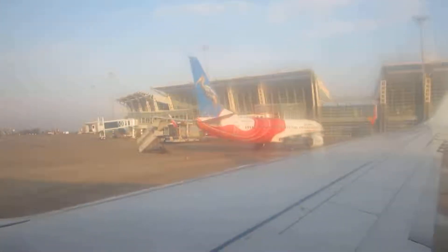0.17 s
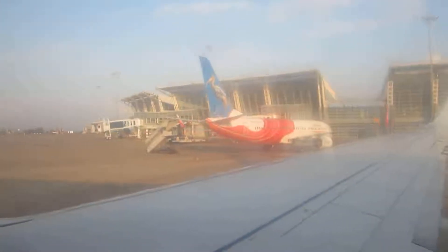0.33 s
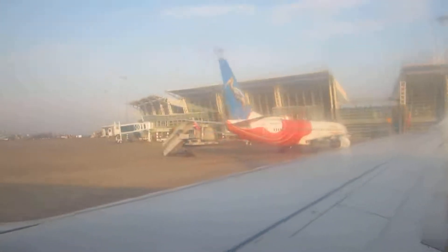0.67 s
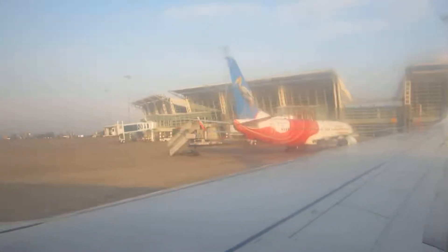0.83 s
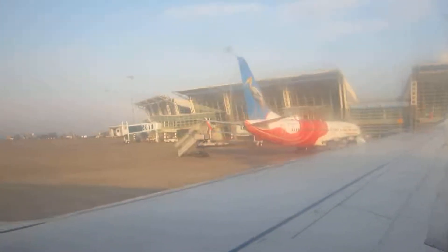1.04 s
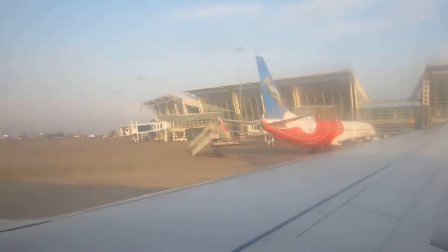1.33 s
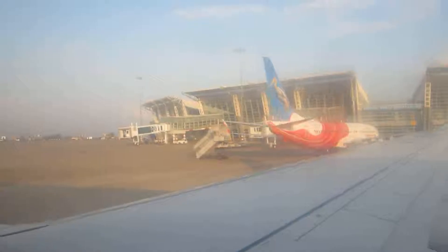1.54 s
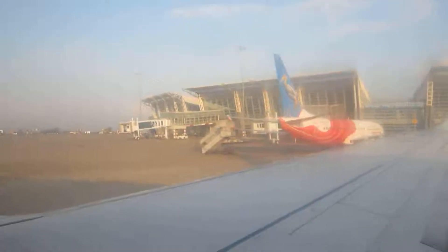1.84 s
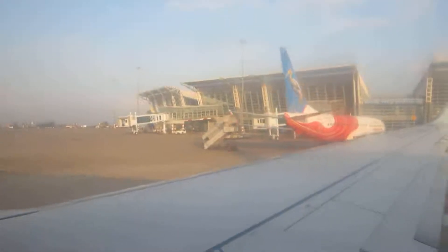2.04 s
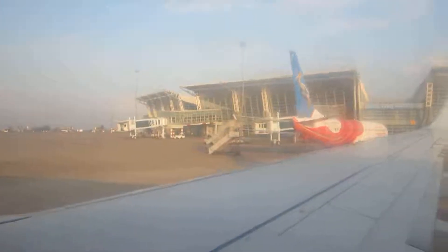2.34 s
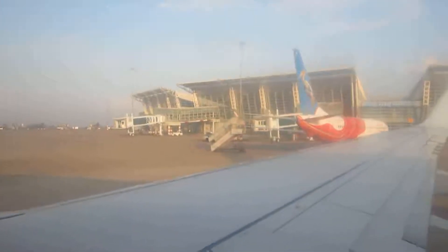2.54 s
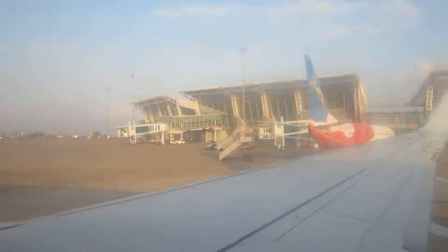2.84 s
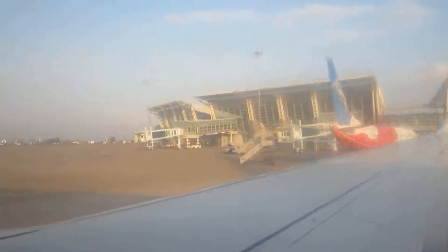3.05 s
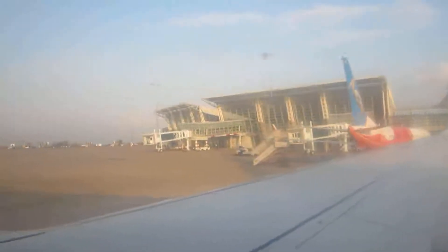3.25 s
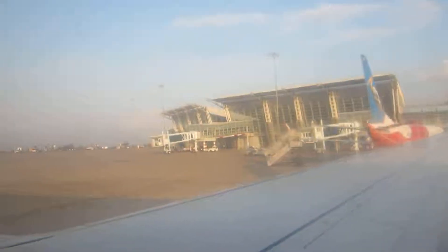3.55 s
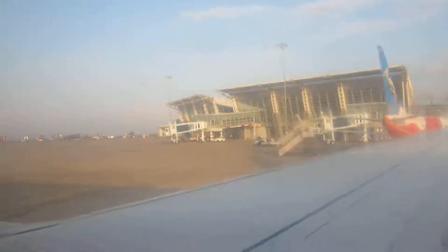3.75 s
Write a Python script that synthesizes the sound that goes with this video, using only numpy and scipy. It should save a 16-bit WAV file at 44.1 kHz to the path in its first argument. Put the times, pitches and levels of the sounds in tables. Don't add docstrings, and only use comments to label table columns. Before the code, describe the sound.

Low booming rumble of a taxiing jet airliner heard inside, with soft hiss and trim ticks

```python
import sys
import numpy as np
from scipy import signal
from scipy.fft import rfft, irfft
from scipy.io import wavfile

SR = 44100
rng = np.random.default_rng(int(sys.argv[2]) if len(sys.argv) > 2 else 0)


def nominal_scale(level):
    x = np.asarray(level, float) / 20
    return 10 ** x


def store_pcm(level_fs):
    pcm = np.round(np.clip(level_fs, -1, 1) * 32767).astype(np.int16)
    wavfile.write(sys.argv[1], SR, np.atleast_2d(pcm).T)


N = 171990

# pitch_hz, density_db
RUMBLE_SPECTRUM = [(7, -39), (34, 0), (40, -6.5), (110, 0.5), (440, -7.5), (478, -11.5), (800, -26),
                   (1100, -32.5)]
# pitch_hz, density_db
ROAR_SPECTRUM = [(410, 3), (700, -4), (760, -6.5), (979, -0.5), (1150, -5), (1510, -6.5), (2420, -8),
                 (3600, -19), (4680, -29), (7920, -120)]
# pitch_hz, width_hz, level_db
CABIN_BOOMS = [(20.3, 34, -39), (46.8, 23, -31.5), (123, 25, -37), (155.1, 25, -37.5), (205, 13, -39.5),
               (269.3, 34, -33), (340.3, 19.5, -36.5), (429.1, 28, -34), (494, 19, -48), (532.3, 41, -49.5)]
# time_s, level_db (about its mean)
LOAD_CURVE = [(0.0, -22), (0.02, -20), (0.14, -25.5), (0.17, -22.5), (0.3, -21.5), (0.35, -20), (0.38, -23),
              (0.95, -22.5), (1.47, -20.5), (1.5, -22), (3.84, -22), (3.9, -20.5)]
# time_s, level_db
THRUST_CURVE = [(0, -1), (.25, 0.5), (.5, -1.5), (.95, .5), (1.5, 0), (1.8, -0.5), (2.4, 1), (2.83, -1.5),
                (3.16, 1), (3.9, 1.5)]
# time_s, rms_db
SHAFT_SWELL = [
    (0, -35),
    (.5, -26.5),
    (1.1, -30),
    (1.5, -25),
    (2.1, -28),
    (2.4, -29.5),
    (2.9, -27),
    (3.35, -27.5),
    (3.9, -36),
]
# multiple, rms_db
PUMP_A_ORDERS = [(1, -48), (3, -48.5), (4, -63), (5, -64)]
PUMP_B_ORDERS = [(1, -51), (2, -54), (3, -59), (4, -69)]
# time_s, rms_db
PUMP_A_BEAT = [(0.0, -53), (0.34, -40), (1.29, -46), (2.1, -42.5), (3.02, -54), (3.25, -39.5), (3.32, -57),
               (3.43, -40), (3.9, -46.5)]
# pitch_hz, width_hz, level_db
COMPRESSOR_WHISTLES = [(612, 60, -50), (865, 90, -54), (1493, 22, -53), (2070, 160, -57), (2420, 200, -57),
                       (3000, 80, -65), (3290, 160, -63), (3800, 250, -64)]
# pitch_hz, width_hz, level_db
VENT_LIP_WHISTLES = [(5828, 60, -67), (6126, 40, -65), (6508, 14, -79), (6767, 12, -78)]
# pitch_hz, density_db
VENT_SPECTRUM = [(2500, -16), (3400, -3), (4200, 0), (5500, -1.5), (6300, -3), (7600, -6.5), (8600, -20),
                 (13000, -30)]
# start_s, pitch_hz
TRIM_TICKS = [
    (.3725, 1290),
    (1.381, 1040),
    (2.096, 1250),
    (.960, 2100),
    (2.36, 820),
]
# peak_db, t60_s, overtone_tilt_db
TRIM_BLOWS = [
    (-21.5, 0.028, -0.5),
    (-26.5, 0.11, -40),
    (-32, 0.025, -7),
    (-37, 0.01, 0),
    (-31, .13, -40),
]
# pitch_ratio, level_db
TRIM_MODES = [(1, 0), (.93, -8), (1.08, -8), (1.52, -2), (2.2, -14), (2.72, -11), (2.85, -12)]
# start_s, pitch_hz, peak_db, t60_s
BUCKLE_MODES = [(.960, 6500, -52, .12), (.960, 5900, -50, .025), (.960, 7700, -50, .03),
                (.962, 10160, -54, .12), (.960, 12450, -55, .14), (.982, 5100, -50, .08),
                (.994, 6500, -50, .1), (.994, 9200, -54, .02), (.999, 10160, -50, .2),
                (.377, 3520, -41, .06), (.379, 3680, -44, .05)]
# start_s, length_s, centre_hz
CLOTH_RUSTLES = [(.115, .025, 9300), (.218, .04, 7000), (.215, .045, 10800), (.345, .02, 9300),
                 (.39, .04, 10000), (.775, .02, 9300), (.958, .012, 6500), (.97, .11, 9800),
                 (1.225, .02, 9300), (1.37, .05, 9500), (1.50, .02, 9000), (1.545, .09, 4800),
                 (1.585, .075, 9500), (2.375, .07, 9300), (2.572, .025, 5500), (2.572, .025, 10500),
                 (3.18, .04, 10000), (3.275, .065, 9800), (3.88, .02, 9500)]
CLOTH_LEVELS = [-61, -55, -59, -60, -57, -61, -54, -60, -61, -61, -62, -51, -58, -62, -56, -60, -60, -60,
                -62]
# start_s, length_s, level_db
CLOTH_SNAPS = [
    (.22, .02, -52),
    (.396, .015, -56),
    (1.585, .02, -52),
    (1.61, .025, -50),
    (.957, .008, -49),
    (3.29, .02, -59),
]
# low_hz, high_hz
SNAP_BAND = (4000, 12500)
# start_s, length_s, low_hz, high_hz
TREBLE_GAPS = [(.306, .012, 4200, 5600), (.31, .03, 6400, 13000), (.345, .018, 3500, 4100),
               (1.135, .02, 6300, 13000), (1.14, .012, 4300, 4800), (1.736, .03, 6600, 13000),
               (1.736, .014, 5200, 6600), (2.53, .028, 6300, 13000), (2.545, .014, 4800, 6300),
               (2.615, .03, 6600, 13000), (2.62, .02, 4700, 5000), (2.782, .03, 4300, 5600),
               (2.782, .03, 6500, 13000), (2.805, .01, 5600, 6500), (2.79, .022, 3200, 3600)]


def rms_one(x):
    return x / np.sqrt(np.mean(x ** 2) + 1e-20)


def in_time(rows):
    time_s, value = np.transpose(rows)
    return np.interp(np.arange(N) / SR, time_s, value)


def drift(rate_hz):
    step = 40
    r = np.exp(-2 * np.pi * rate_hz * step / SR)
    slow = signal.lfilter([1], [1, -2 * r, r * r], rng.standard_normal(N // step + 4002))
    slow = slow[4000:]
    return np.interp(np.arange(N) / step, np.arange(len(slow)), rms_one(slow - slow.mean()))


def coloured(spectrum, patchy_db, rate_hz):
    hz, db = np.transpose(spectrum)
    octave = np.log2(np.maximum(np.arange(N // 2 + 1) * SR / N, 1))
    gain = nominal_scale(np.interp(octave, np.log2(hz), db, left=-90, right=-90))
    shaped = rfft(rng.standard_normal(N)) * gain
    out = np.zeros(N)
    for centre in range(3, 15):
        band = np.clip(1 - abs(octave - centre), 0, 1)
        out += irfft(shaped * band, N) * nominal_scale(patchy_db * drift(rate_hz))
    return rms_one(out)


def resonant_noise(hz, width_hz):
    r = np.exp(-np.pi * width_hz / SR)
    poles = [1, -2 * r * np.cos(2 * np.pi * hz / SR), r * r]
    once = rms_one(signal.lfilter([1, 0, -1], poles, rng.standard_normal(N + SR // 4)))
    return rms_one(signal.lfilter([1, 0, -1], poles, once)[SR // 4:])


def resonances(rows):
    return sum(nominal_scale(db) * resonant_noise(hz, width_hz) for hz, width_hz, db in rows)


def tone(hz, wander_hz, flutter_db):
    turns = np.cumsum(hz + wander_hz * drift(2.1)) / SR + rng.random()
    return np.sqrt(2) * np.sin(2 * np.pi * turns) * nominal_scale(flutter_db * drift(6.2))


def ring(start_s, peak_db, hz, t60_s):
    t = np.maximum(np.arange(N) / SR - start_s, 0)
    rise = 1 - np.exp(-t / 0.00024)
    return nominal_scale(peak_db - 60 * t / t60_s) * np.sin(2 * np.pi * hz * t) * rise


def fuselage():
    load_db = in_time(LOAD_CURVE)
    load_db = load_db - load_db.mean()
    rumble = nominal_scale(-21.5) * coloured(RUMBLE_SPECTRUM, patchy_db=0.84, rate_hz=0.49)
    booms = resonances(CABIN_BOOMS)
    roar = nominal_scale(-38.94) * coloured(ROAR_SPECTRUM, patchy_db=1.16, rate_hz=9.2)
    roar_db = 0.38 * load_db + in_time(THRUST_CURVE)
    return nominal_scale(load_db) * (rumble + booms) + nominal_scale(roar_db) * roar


def shaft():
    return nominal_scale(in_time(SHAFT_SWELL)) * tone(147, wander_hz=1.28, flutter_db=0.5)


def pumps():
    pump_a_hz, pump_b_hz = 335, 881.7
    out = nominal_scale(in_time(PUMP_A_BEAT) + 0.5) * tone(2 * pump_a_hz, wander_hz=0.57, flutter_db=1.3)
    for hz, orders in ((pump_a_hz, PUMP_A_ORDERS), (pump_b_hz, PUMP_B_ORDERS)):
        for k, db in orders:
            out += nominal_scale(db) * tone(k * hz, wander_hz=0.34 * k, flutter_db=3.4)
    return out


def whistles():
    return resonances(COMPRESSOR_WHISTLES) + resonances(VENT_LIP_WHISTLES)


def trim():
    out = np.zeros(N)
    for (start_s, hz), (peak_db, t60_s, tilt_db) in zip(TRIM_TICKS, TRIM_BLOWS):
        for ratio, mode_db in TRIM_MODES:
            level_db = peak_db + mode_db + tilt_db * np.sqrt(abs(np.log2(ratio)))
            out += ring(start_s, level_db, hz * ratio, t60_s / np.sqrt(ratio))
    return out


def buckle():
    return sum(ring(start_s, db, hz, t60_s) for start_s, hz, db, t60_s in BUCKLE_MODES)


def rustles():
    t = np.arange(N) / SR
    grains_per_s, width_octaves = 8400, 0.22
    out = np.zeros(N)
    grains = rng.standard_normal(N) * (0.62 + (rng.random(N) < grains_per_s / SR))
    for (start_s, length_s, hz), db in zip(CLOTH_RUSTLES, CLOTH_LEVELS):
        edges = hz * 2 ** (width_octaves * np.array([-0.5, 0.5]))
        edges = np.clip(edges, 100, 0.45 * SR)
        band = rms_one(signal.sosfilt(signal.butter(2, edges, "band", fs=SR, output="sos"), grains))
        u = (t - start_s) / length_s
        swell = np.clip(u * 12, 0, 1) * np.clip((1 - u) * 2, 0, 1)
        out += nominal_scale(db) * band * swell
    return out


def snaps():
    t = np.arange(N) / SR
    band_filter = signal.butter(2, SNAP_BAND, "band", fs=SR, output="sos")
    hiss = rms_one(signal.sosfilt(band_filter, rng.standard_normal(N)))
    swell = np.zeros(N)
    for start_s, length_s, db in CLOTH_SNAPS:
        swell += nominal_scale(db) * np.sin(np.pi * np.clip((t - start_s) / length_s, 0, 1))
    return hiss * swell


def vents():
    return nominal_scale(-52 + in_time(THRUST_CURVE)) * coloured(VENT_SPECTRUM, patchy_db=0.8, rate_hz=9.0)


def scene():
    engines = fuselage() + shaft() + pumps() + whistles()
    touches = trim() + buckle() + rustles() + snaps()
    return (engines + touches + vents())[None]


def band_limit(x):
    return signal.sosfilt(signal.butter(12, 12720, fs=SR, output="sos"), x)


def record(dry):
    t, hz = np.arange(N) / SR, np.arange(N // 2 + 1) * SR / N
    spectrum = rfft(dry)
    mix = dry
    for start_s, length_s, low_hz, high_hz in TREBLE_GAPS:
        inside_s = np.minimum(t - start_s, start_s + length_s - t)
        gate = np.clip(inside_s / 0.004 + 1, 0, 1)
        lost = irfft(spectrum * (hz > low_hz) * (hz < high_hz), N)
        mix = mix - gate * lost
    return band_limit(mix)


dry = scene()
out = record(dry)
store_pcm(out)
```